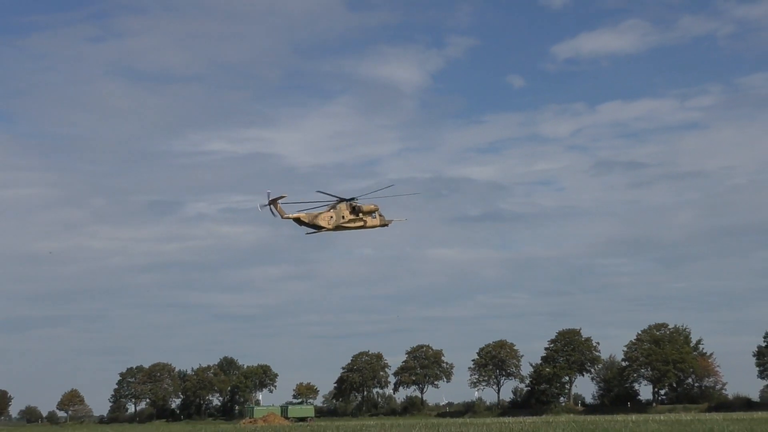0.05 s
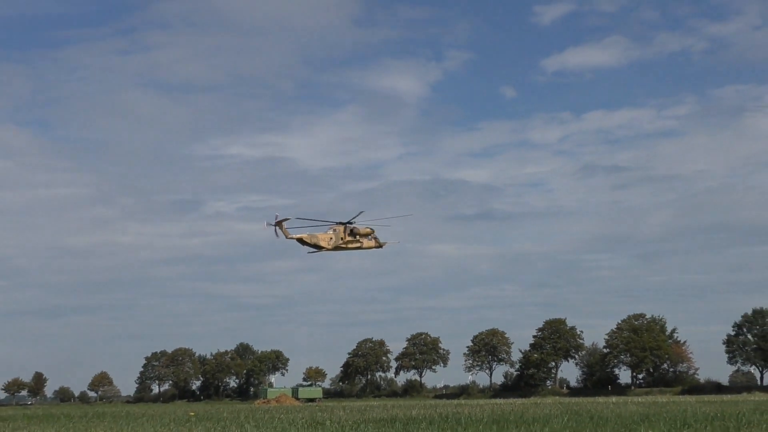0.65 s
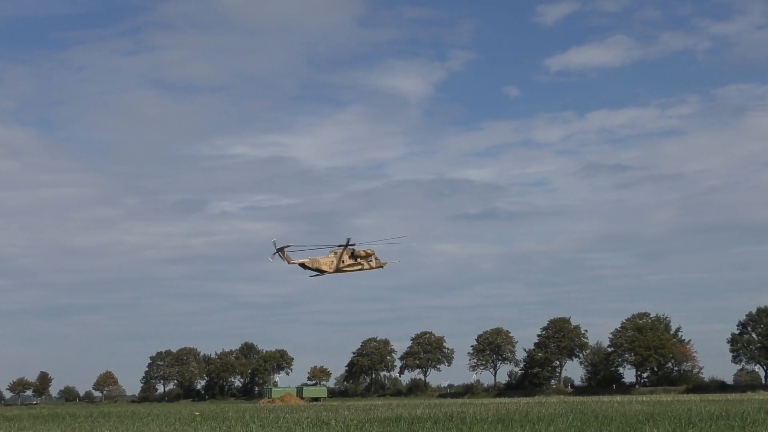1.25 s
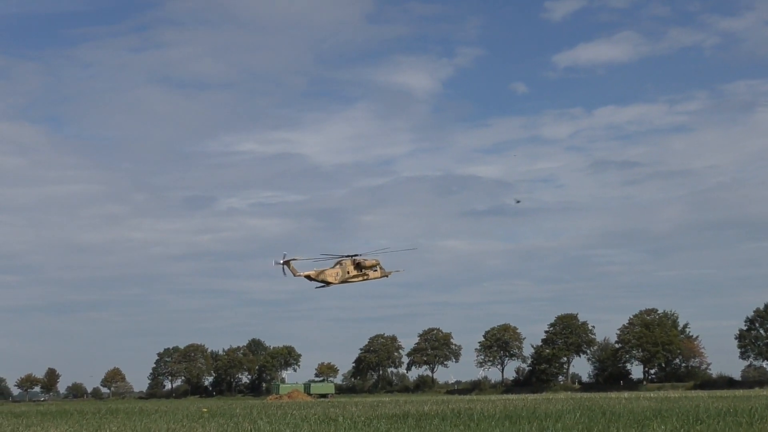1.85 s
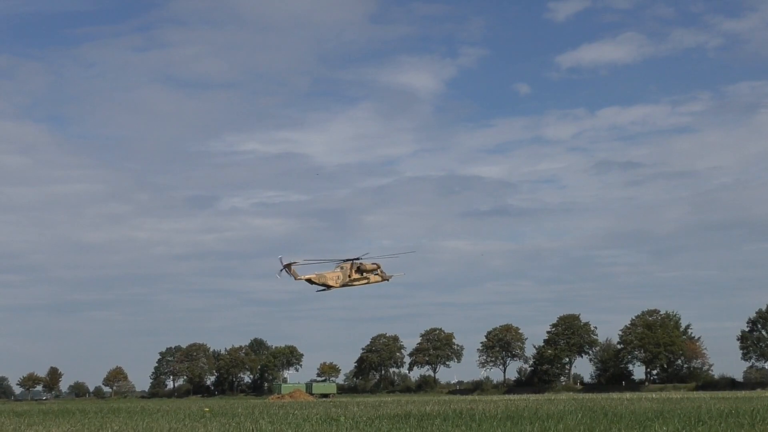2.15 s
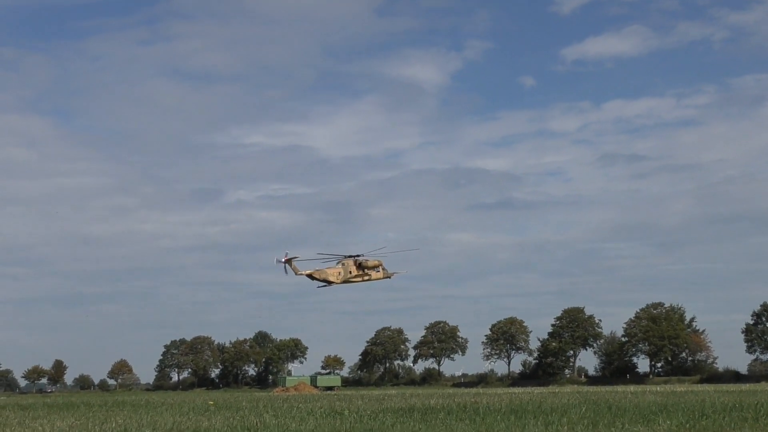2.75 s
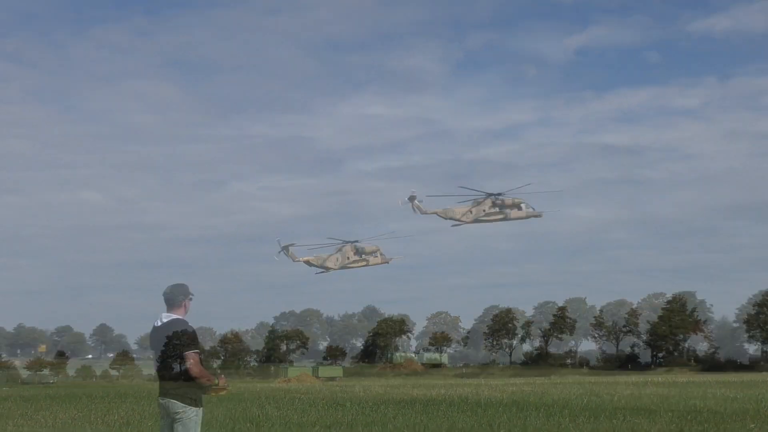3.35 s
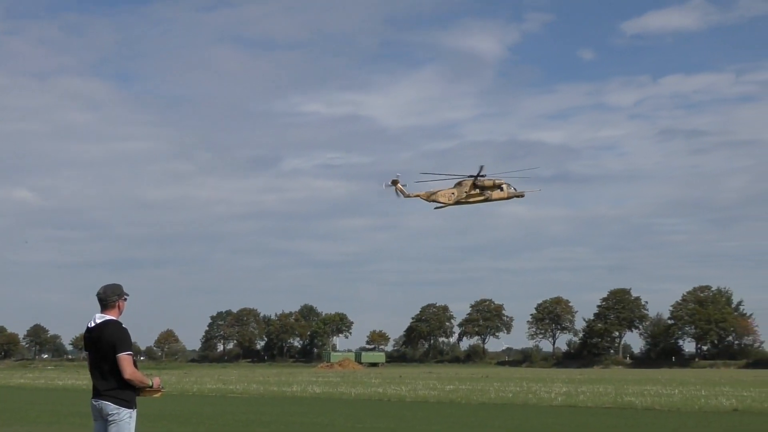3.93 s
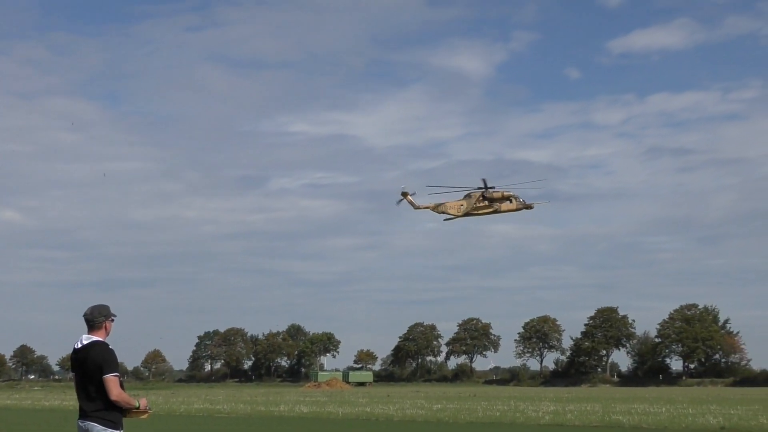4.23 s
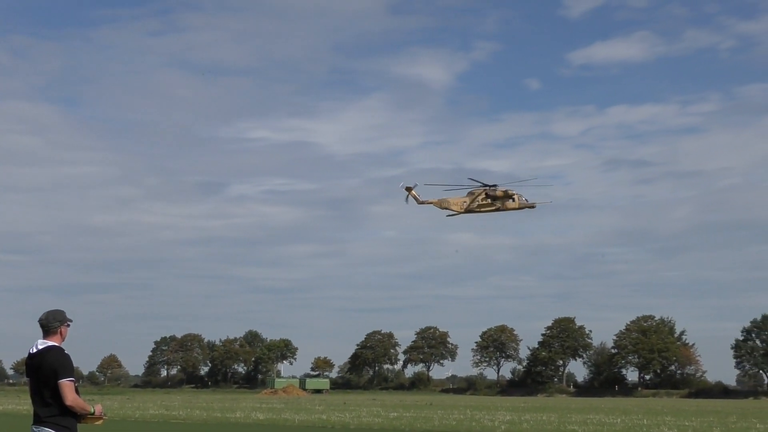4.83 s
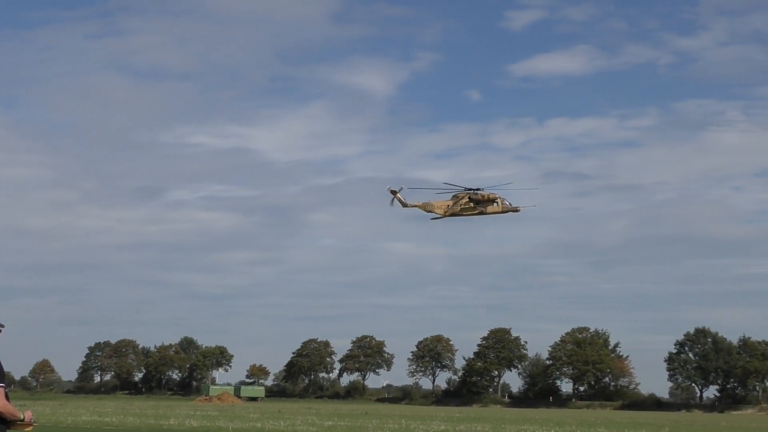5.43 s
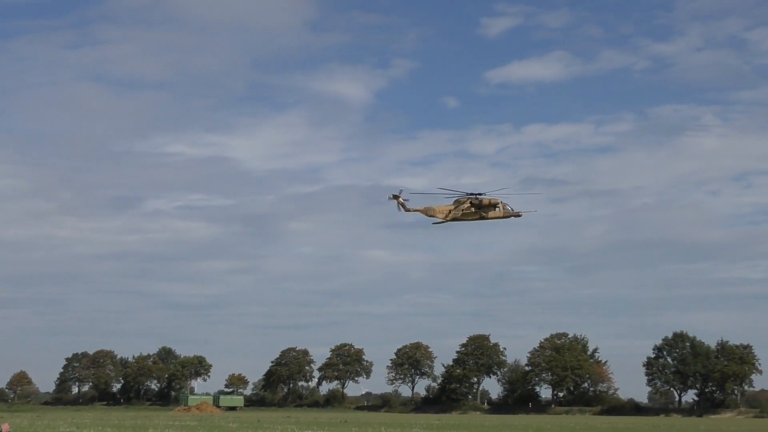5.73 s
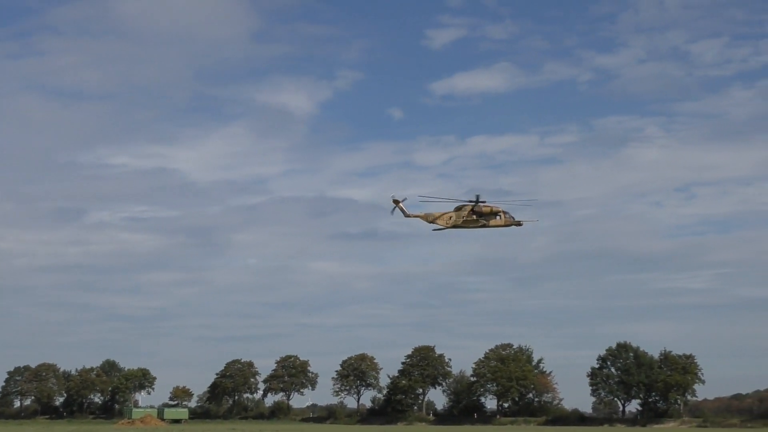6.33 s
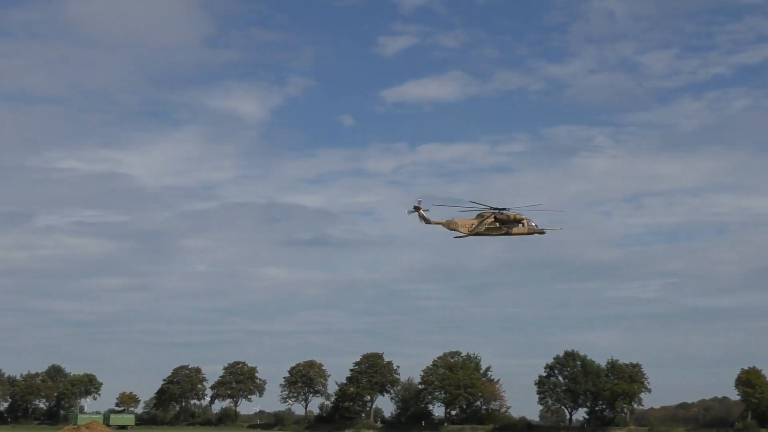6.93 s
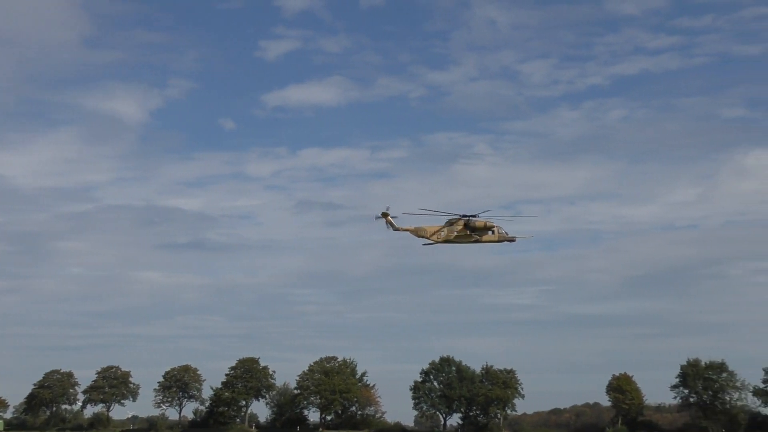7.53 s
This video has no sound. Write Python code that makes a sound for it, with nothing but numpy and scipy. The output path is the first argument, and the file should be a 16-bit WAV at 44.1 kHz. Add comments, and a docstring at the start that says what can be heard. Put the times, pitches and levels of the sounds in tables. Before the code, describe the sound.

A large model helicopter hovers over an open field, its rotor roaring and turbine hissing with a high whine, first near, then farther off.

```python
"""A large turbine model helicopter hovers over an open field, heard from near by, then from farther off.
Blade vortices roar, the exhaust jet rushes, tailpipe and casing howl in narrow bands.
The intake hisses under the compressor's whine; rotors and gears hum faintly.
The shaft tone swells as the near sound fades into the far one, then dies down.
As the helicopter climbs, its ground echo lags more and sweeps slowly through the rush."""
import sys
import numpy as np
from scipy import signal
from scipy.fft import rfft, irfft
from scipy.io import wavfile
from scipy.ndimage import map_coordinates

SR = 44100
rng = np.random.default_rng(int(sys.argv[2]) if len(sys.argv) > 2 else 0)


def inscribe(sig):
    """Save sig as 16-bit PCM at rate SR to the path in sys.argv[1].

    A 1-D sig is mono; a 2-D sig holds one channel per row.
    Samples are clipped to [-1, 1] before scaling.
    """
    pcm = np.round(np.clip(np.atleast_2d(sig).T, -1, 1) * 32767)
    wavfile.write(sys.argv[1], SR, pcm.astype(np.int16))


N = 338688

# Rotor wash spectra. Each row: frequency in Hz, relative density in dB.
WASH_NEAR_SPECTRUM = [(20, -55), (34, -41), (90, -22.5), (191, -7.5), (286, -12), (456, -7.5), (546, -1.5),
                      (630, -2.5), (700, -3), (786, -13), (902, -22), (1000, -22), (1100, -33)]
WASH_FAR_SPECTRUM = [(20, -57), (34, -47), (90, -27), (150, -19), (202, -12.5), (309, -25), (455, -18.5),
                     (534, -3.5), (670, -0.4), (720, -2.5), (773, -11), (915, -24.5), (1000, -23),
                     (1100, -37)]
# Exhaust spectra. Each row: frequency in Hz, relative density in dB.
EXHAUST_NEAR_SPECTRUM = [(900, -38), (1000, -7), (1060, 5), (1370, -6), (1630, -2), (1800, -6), (2050, -5),
                         (2250, -4), (2450, -8), (2950, -7.5), (3500, -10.8), (4400, -12), (5400, -18),
                         (5800, -19), (6100, -23), (7100, -26), (7600, -36)]
EXHAUST_FAR_SPECTRUM = [(900, -42), (970, -17), (1086, 0.5), (1437, -6.5), (1626, -5.5), (1841, -14),
                        (2140, -5), (2430, -13), (2750, -10), (3070, -17), (3280, -14.5), (3800, -19.5),
                        (4550, -25.5), (4850, -27.5), (5480, -27.5), (5750, -40), (6400, -37), (6960, -45),
                        (7600, -36)]
# Short reflections of the near exhaust. Each row: lag in seconds, linear gain.
NEAR_REFLECTIONS = [(.001583, .15), (.0019, .14), (.002046, .21), (.002378, .09)]
# Exhaust treble. Each row: time in seconds, level in dB.
EXHAUST_TREBLE = [(0, -39.5), (.6, -40.5), (1.55, -40), (2.0, -42.5), (3.2, -41), (3.42, -43.5),
                  (3.7, -39.5), (4.3, -40.5), (4.9, -41.5), (5.95, -37), (6.35, -37), (6.7, -39),
                  (7.68, -38.5)]
# Tailpipe and casing modes. Each row: centre and half-width in Hz, near and far level in dB.
CASING_MODES = [(664.4, 27.5, -32.5, -33), (1067, 31, -49, -50.5), (5800, 70, -69, -90)]
# Intake beaming as the fuselage swings.
# Each row: time in seconds, then relative levels of hiss, top hiss and whine in dB.
INTAKE_BEAMING = [(0, -50, -51.3, -51), (.19, -45.8, -44.7, -47), (.41, -50, -50.8, -50),
                  (.58, -46.3, -45.3, -47.5), (.76, -48.5, -47, -53), (.86, -48.3, -47.5, -48),
                  (1.1, -49.5, -50, -52), (1.26, -46, -42.5, -46.5), (1.6, -44.8, -43.7, -40.7),
                  (1.85, -49.8, -51.5, -48), (2.02, -52.3, -52.7, -53.5), (2.17, -47.3, -47.7, -46),
                  (2.5, -48, -48.3, -47), (2.76, -51, -49.3, -50), (2.98, -52.7, -49.8, -60),
                  (3.19, -51, -51.5, -48), (3.3, -51.5, -53, -48.7), (3.5, -56, -54.8, -55),
                  (4.05, -57, -56.3, -61), (4.4, -56.5, -54.8, -59), (7.68, -58, -58, -62.5)]
# Turbine speed. Each row: time in seconds, compressor blade rate in Hz.
COMPRESSOR_RATE = [(0, 9770), (.35, 9760), (.85, 9785), (1.6, 9770), (2.2, 9755), (2.9, 9738), (3.8, 9778),
                   (5.3, 9815), (6.5, 9775), (7.68, 9812)]
# The intake's two hiss bands. Each row: frequency in Hz, relative density in dB.
HISS_SPECTRUM = [(7000, -30), (7650, -16), (8150, -1.5), (9000, 1), (9600, -0.5), (10100, -2),
                 (10600, -9.5), (11500, -11.5), (12000, -27)]
TOP_HISS_SPECTRUM = [(6650, -35), (11300, -13.5), (12400, 2), (13000, 0), (13700, -2), (14700, .5),
                     (15600, -3), (16000, -8)]
# Tail rotor and gear tones. Each row: frequency at starting speed in Hz, near and far level in dB.
DRIVE_TONES = [(414.3, -67, -53), (829, -57, -46.5), (2594, -56, -70), (2742, -55, -57.5), (3256, -61, -62),
               (3365, -61.5, -70)]
# Ground echo during the climb. Each row: time in seconds, lag in seconds.
GROUND_ECHO_LAG = [(3.5, .00108), (4.3, .00113), (4.8, .001255), (5.7, .001338), (6.4, .001355),
                   (7.1, .00142), (7.68, .001435)]
# Microphone ports. Each row: frequency in Hz, left over right in dB, left lead in radians, coherence 0-1.
MIC_PORTS = [(30, 0, -.1, .8), (100, 1, -0.15, .99), (300, 0, -0.16, .99), (720, -2.5, -0.082, 0.99),
             (900, -1, 0.06, 0.98), (1040, -2.5, -0.01, 0.97), (1360, 0, 0.023, 1), (1670, -2.5, .05, 0.96),
             (1990, -1, -0.16, 1), (4060, -0.5, -0.14, 0.98), (5030, -3, .05, 0.85), (5270, 2, 0.39, 0.89),
             (6040, -1, 0, 1), (10300, 0.5, 0, 1), (12000, 1, -.4, 0.87), (13200, -1.5, -.15, 1),
             (14500, 0, 0, 0.97)]

MOVE_S, MOVE_EASE_S = 3.5, 0.066   # crossfade, near to far
FAR_SHARE_BEFORE, FAR_SHARE_AFTER = 0.016, 0.92
MAIN_BLADE_HZ, COMPRESSOR_BLADES = 116, 6
WASH_LEAD_S = 0.061   # the low roar changes to its far sound just before the exhaust does
WASH_DIP_DB, WASH_DIP_S, WASH_DIP_WIDTH_S = 4.5, 3.414, 0.14
EXHAUST_SPLIT_HZ, CUTOFF_HZ = 2190, 15850
HISS_TRIM_DB, TOP_HISS_TRIM_DB = 3, 1.2
SMEAR_HZ, SMEAR_TRIM_DB = 80, 2
SHAFT_NEAR_DB, SHAFT_PEAK_DB, SHAFT_PEAK_S = -59, -36.5, 3.67
SHAFT_RISE_DB_PER_S, SHAFT_FADE_DB_PER_S = 29, 6.5


def from_db(db):
    return 10 ** (np.asarray(db) / 20)


def unit_rms(x):
    return x / np.sqrt(np.mean(x ** 2) + 1e-20)


def time_s():
    return np.arange(N) / SR


def bin_hz():
    return np.maximum(np.arange(N // 2 + 1), 1) * SR / N


def per_sample(rows):
    """Each value column of a time table, at every sample."""
    knots_s, *columns = np.transpose(rows)
    return [np.interp(time_s(), knots_s, column) for column in columns]


def per_bin(rows, beyond=None):
    """Each value column of a frequency table, at every bin; log-frequency axis."""
    hz, *columns = np.transpose(rows)
    return [np.interp(np.log(bin_hz()), np.log(hz), column, beyond, beyond) for column in columns]


def noise(bin_gain):
    """Shaped noise; rms 1."""
    return unit_rms(irfft(rfft(rng.standard_normal(N)) * bin_gain, N))


def turbulence(spectrum):
    """Flow noise with a tabled spectrum; rms 1."""
    return noise(from_db(per_bin(spectrum, beyond=-np.inf)[0]))


def drift(rate_hz):
    """Random wander, mostly below rate_hz; rms 1."""
    return noise(1 / (1 + (bin_hz() / rate_hz) ** 2))


def rotation_rad(hz, wander, rate_hz):
    """Phase of a part turning at slightly unsteady speed."""
    return 2 * np.pi * np.cumsum(hz * (1 + wander * drift(rate_hz))) / SR


def tone(phase_rad, flutter_db, rate_hz):
    """A tone fluttering through moving air; rms 1."""
    return unit_rms(np.sin(phase_rad) * from_db(flutter_db * drift(rate_hz)))


def steadied(x, evenness, window_s):
    """Constant drive evens out chance swells; rms 1."""
    power = np.abs(irfft(rfft(x ** 2) * np.exp(-(bin_hz() * window_s) ** 2), N))
    return unit_rms(x / (power + 1e-9) ** (evenness / 2))


def delayed(x, lag_s):
    """A longer path, steady or changing."""
    return map_coordinates(x, [np.arange(N) - lag_s * SR], order=3, mode="nearest")


def farness(lead_s=0):
    """Eases from 0, near, to 1, far."""
    return .5 + .5 * np.tanh((time_s() + lead_s - MOVE_S) / (2 * MOVE_EASE_S))


def crossfade(near, far, lead_s=0):
    """Equal-power blend, from mostly near to mostly far."""
    far_share = FAR_SHARE_BEFORE + (FAR_SHARE_AFTER - FAR_SHARE_BEFORE) * farness(lead_s)
    return np.sqrt(1 - far_share) * near + np.sqrt(far_share) * far


def distance_gain(near_db, far_db):
    """Gain as power passes from its near to its far value."""
    return np.sqrt((1 - farness()) * from_db(near_db) ** 2 + farness() * from_db(far_db) ** 2)


def main_rotor(blade_rad):
    """Shed vortices roar and beat at the blade rate, over a low hum of blade thrust."""
    wash = crossfade(turbulence(WASH_NEAR_SPECTRUM), turbulence(WASH_FAR_SPECTRUM), WASH_LEAD_S)
    wash = ground_echo(wash, gain=0.41)   # grass reflects low tones best
    wash = steadied(wash, evenness=0.96, window_s=0.038)
    beat = 1 + 0.022 * np.cos(blade_rad)
    dip = from_db(-WASH_DIP_DB * np.exp(-((time_s() - WASH_DIP_S) / WASH_DIP_WIDTH_S) ** 2))
    thrust = crossfade(from_db(-51), from_db(-61)) * tone(blade_rad, flutter_db=1, rate_hz=2.7)
    return distance_gain(near_db=-24, far_db=-26.5) * dip * wash * beat + thrust


def exhaust(blade_rad):
    """The jet rushes; its beamed treble comes and goes, chopped by each passing blade."""
    near = near_reflections(turbulence(EXHAUST_NEAR_SPECTRUM))
    jet = ground_echo(crossfade(near, turbulence(EXHAUST_FAR_SPECTRUM)), gain=0.26)
    lows = irfft(rfft(jet) / (1 + (bin_hz() / EXHAUST_SPLIT_HZ) ** 10), N)
    body = distance_gain(near_db=-39, far_db=-30) * steadied(lows, evenness=0.44, window_s=0.35)
    treble = steadied(jet - lows, evenness=0.54, window_s=0.95)
    chop = 1 + crossfade(0.12, .02) * np.cos(blade_rad)
    return body + from_db(per_sample(EXHAUST_TREBLE)[0]) * treble * chop


def near_reflections(x):
    """Short reflections carve steady peaks and notches; rms 1."""
    return unit_rms(x + sum(gain * delayed(x, lag_s) for lag_s, gain in NEAR_REFLECTIONS))


def casing_howl():
    """Steady flow keeps tailpipe and casing howling in narrow bands."""
    howl = 0
    for hz, half_width_hz, near_db, far_db in CASING_MODES:
        band = noise(1 / (1 + ((bin_hz() - hz) / half_width_hz) ** 2))
        gain = crossfade(from_db(near_db), from_db(far_db))
        howl += gain * steadied(band, evenness=0.98, window_s=0.023)
    return howl


def turbine():
    """Intake hiss and compressor whine, beamed as the fuselage swings, plus the shaft tone."""
    hiss_db, top_db, whine_db = per_sample(INTAKE_BEAMING)
    compressor_rad = rotation_rad(per_sample(COMPRESSOR_RATE)[0], wander=0.000617, rate_hz=25.8)
    hiss = intake_hiss(HISS_SPECTRUM, hiss_db + HISS_TRIM_DB, shimmer_db=1, rate_hz=50)
    hiss += intake_hiss(TOP_HISS_SPECTRUM, top_db + TOP_HISS_TRIM_DB, shimmer_db=0.67, rate_hz=70)
    whine = from_db(whine_db) * compressor_whine(compressor_rad)
    return hiss + whine + shaft_tone(compressor_rad / COMPRESSOR_BLADES)


def intake_hiss(spectrum, level_db, shimmer_db, rate_hz):
    """Eddies in the air scatter the shortest waves, so the hiss shimmers."""
    return from_db(level_db + shimmer_db * drift(rate_hz)) * turbulence(spectrum)


def compressor_whine(phase_rad):
    """A blade-rate line; far off, moving air smears it into a narrow band."""
    line = distance_gain(near_db=2.7, far_db=-2) * tone(phase_rad, flutter_db=2, rate_hz=53)
    smear = unit_rms(np.sin(phase_rad) * drift(SMEAR_HZ) + np.cos(phase_rad) * drift(SMEAR_HZ))
    return line + from_db(SMEAR_TRIM_DB) * farness() * smear


def shaft_tone(phase_rad):
    """One cycle per shaft turn; swells as the near sound gives way to the far one, then fades."""
    past_peak_s = time_s() - SHAFT_PEAK_S
    below_peak_db = np.maximum(-SHAFT_RISE_DB_PER_S * past_peak_s, SHAFT_FADE_DB_PER_S * past_peak_s)
    gain = from_db(SHAFT_NEAR_DB) * (1 - farness()) + from_db(SHAFT_PEAK_DB - below_peak_db)
    return gain * tone(phase_rad, flutter_db=3.5, rate_hz=13)


def drive_train():
    """Tail rotor and gear teeth hum, tracking turbine speed."""
    speed_ratio = per_sample(COMPRESSOR_RATE)[0] / COMPRESSOR_RATE[0][1]
    hum = 0
    for hz, near_db, far_db in DRIVE_TONES:
        phase_rad = rotation_rad(hz * speed_ratio, wander=0.000995, rate_hz=1.52)
        gain = crossfade(from_db(near_db), from_db(far_db))
        hum += gain * tone(phase_rad, flutter_db=3, rate_hz=4.3)
    return hum


def ground_echo(x, gain):
    """Far off, a second arrival off the grass carves a comb; the climb sweeps it."""
    return x + gain * farness() * delayed(x, per_sample(GROUND_ECHO_LAG)[0])


def microphone(x):
    """Two close ports differ slightly in level and phase; scattered sound arrives in random phase."""
    balance_db, lead_rad, coherence = per_bin(MIC_PORTS)
    direct = rfft(x)
    knots_hz = np.arange(0, SR, 5)
    scatter_rad = np.pi * np.interp(bin_hz(), knots_hz, rng.standard_normal(len(knots_hz)))
    mid = np.sqrt((1 + coherence) / 2) * direct
    side = np.sqrt((1 - coherence) / 2) * direct * np.exp(1j * scatter_rad)
    lean = from_db(balance_db / 2) * np.exp(.5j * lead_rad)
    return irfft(np.array([(mid + side) * lean, (mid - side) / lean]), N)


def scene():
    """The helicopter in open air, in stereo."""
    blade_rad = rotation_rad(MAIN_BLADE_HZ, wander=.003, rate_hz=1.33)
    helicopter = main_rotor(blade_rad) + exhaust(blade_rad) + casing_howl() + turbine() + drive_train()
    return microphone(helicopter)


def record(dry):
    """Steep low-pass."""
    return signal.sosfilt(signal.ellip(12, .1, 90, CUTOFF_HZ, fs=SR, output="sos"), dry)


dry = scene()
out = record(dry)
inscribe(out)
```